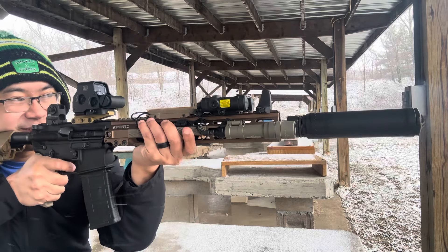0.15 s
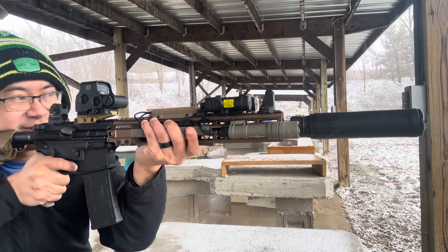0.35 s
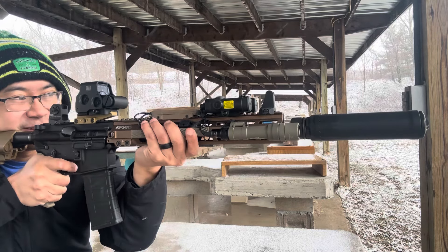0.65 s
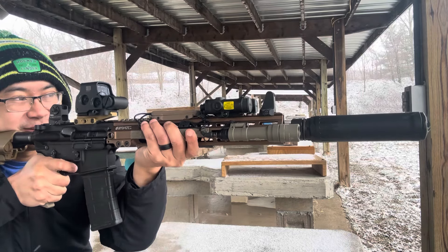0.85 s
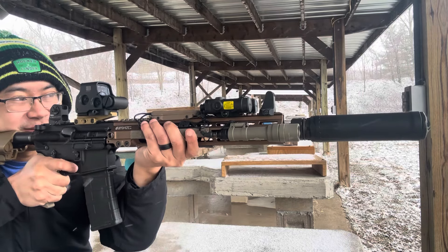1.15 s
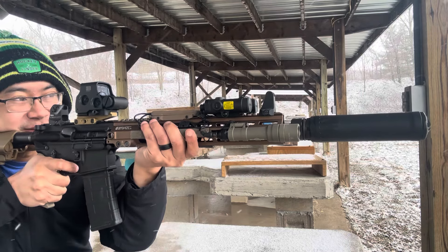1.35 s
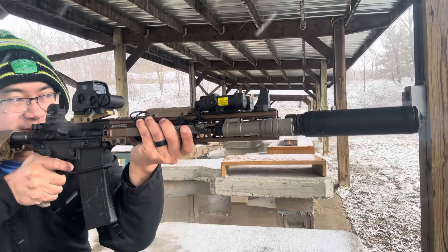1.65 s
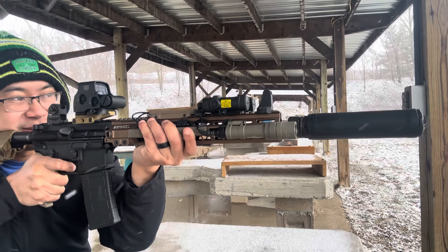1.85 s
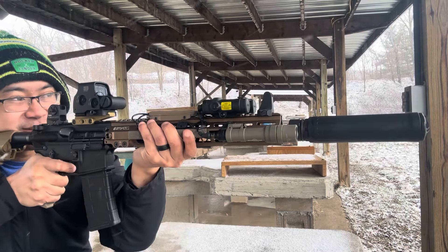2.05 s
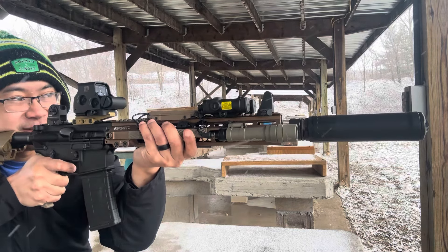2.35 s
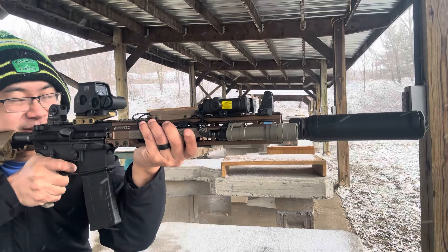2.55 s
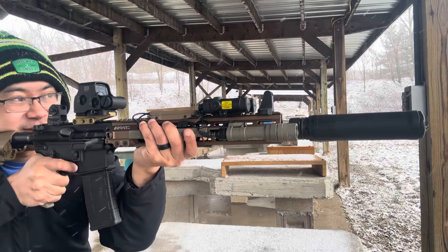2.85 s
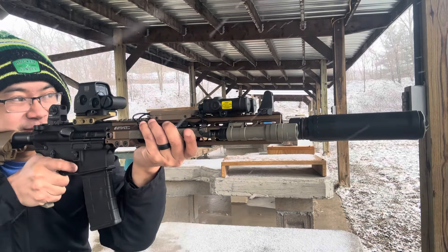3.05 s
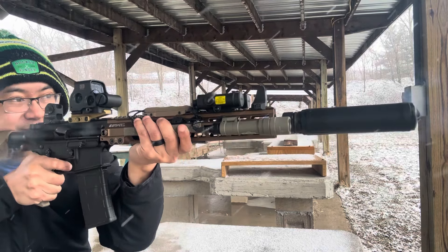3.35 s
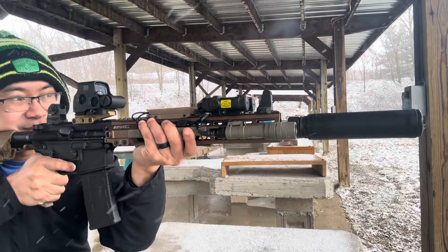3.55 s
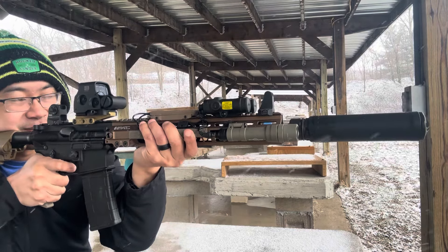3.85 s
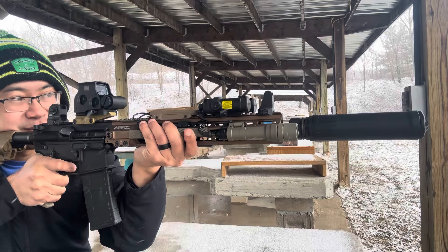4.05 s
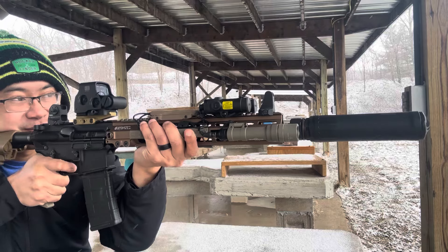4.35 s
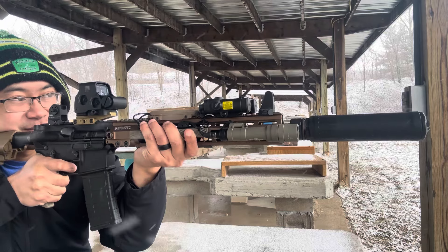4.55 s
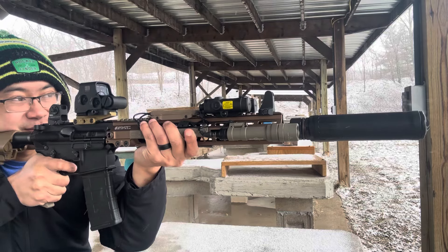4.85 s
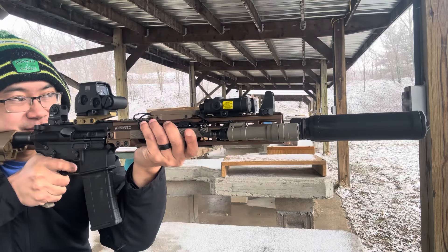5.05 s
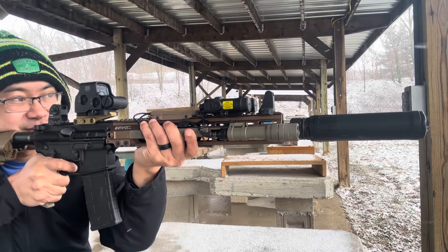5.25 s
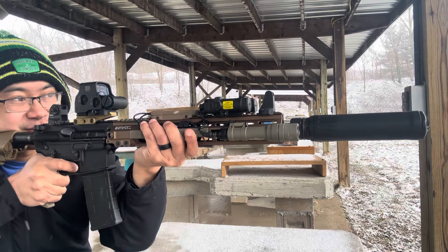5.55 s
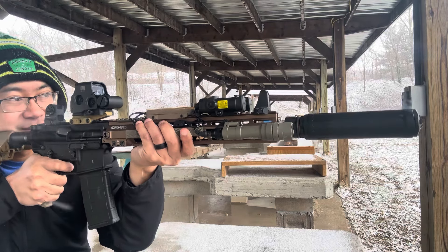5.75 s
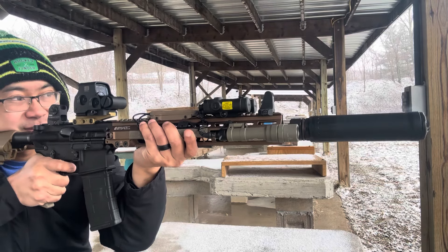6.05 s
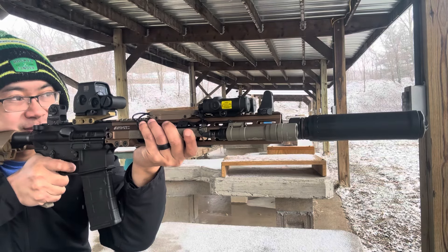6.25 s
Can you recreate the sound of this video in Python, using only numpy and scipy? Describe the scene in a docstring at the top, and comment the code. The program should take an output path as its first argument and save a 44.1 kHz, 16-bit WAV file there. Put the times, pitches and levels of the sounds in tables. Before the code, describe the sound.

Four spaced suppressed rifle shots crack and boom under a tin-roofed winter range, with bolt clacks, woodland echoes, trigger clicks and tinkling brass.

```python
"""Suppressed rifle under a tin roof

Four shots from a semi-automatic rifle on a winter firing line: each is a noise-burst crack, a rush of gas
and the bolt slamming home. Decaying modes make the shelter boom; delayed, dulling noise is the woods' echo.
Between shots brass rings in beating modes, the trigger clicks and shaped noise is wind on the microphone.
"""
import sys
import numpy as np
from scipy import signal
from scipy.io import wavfile

SR = 44100
rng = np.random.default_rng(int(sys.argv[2]) if len(sys.argv) > 2 else 0)


def materialize(psi):
    """Save the field psi as 16-bit PCM at rate SR to the path in sys.argv[1].

    A 1-D psi becomes a single channel; in a 2-D psi each row is a channel.
    """
    bounded = np.clip(np.atleast_2d(psi).T, -1, 1)
    quanta = np.round(bounded * 32767).astype(np.int16)
    wavfile.write(sys.argv[1], SR, quanta)


N = 282681

# standing waves between roof, slab and benches: frequency_hz, relative_level_db, t60_s
SHELTER_MODES = [(132.9, -15, 0.75), (148.5, -26.5, 0.76), (208.8, -25.5, 0.43), (288.2, -28.5, 0.55),
                 (342, -27, 0.45), (419.1, -26, 0.12), (558.8, -19.5, 0.16), (608, -13.5, .2),
                 (755, -20.5, 0.28), (999, -21, 0.17), (1130, -24.5, 0.18), (1284, -28, 0.13),
                 (1404, -28.5, 0.21)]
# spectrum of the dull rush before the crack and of the opening burst: frequency_hz, density_db_per_hz
RUSH_SPECTRUM = [(80, -12.5), (300, 4), (1000, -4.5), (3000, -3), (7000, -7.5), (9000, -38.5),
                 (15000, -53.5)]

BAND_EDGES_HZ = 22 * 2 ** (np.arange(25) * 0.4)
BANDS = [signal.butter(2, edges, "band", fs=SR, output="sos")
         for edges in zip(BAND_EDGES_HZ, BAND_EDGES_HZ[1:])]


def from_db(db):
    """Logarithmic level: 20 dB is a factor of ten in pressure."""
    return 10 ** (np.asarray(db) / 20)


def at_hz(points, hz):
    """Linear interpolation of a table on a logarithmic frequency axis."""
    table_hz, value = np.transpose(points)
    return np.interp(np.log(hz), np.log(table_hz), value)


def seconds(length_s):
    """Sampled time axis, starting at zero."""
    return np.arange(int(length_s * SR)) / SR


def add(out, start_s, sound):
    """Superposition: sound pressures sum, from the start time on."""
    start = max(0, int(start_s * SR))
    part = sound[..., :max(0, N - start)]
    out[:, start:start + part.shape[-1]] += part


def dying(t, t60):
    """Exponential decay, by 60 dB in t60 seconds."""
    return from_db(-60 * t / t60)


def hump(t, peak_s, half_s):
    """Gaussian rise and fall of height 1, down to 1/e at half_s from its peak."""
    return np.exp(-((t - peak_s) / half_s) ** 2)


def waver(t, step_s):
    """Slow random fluctuation: a new normal value every step, joined by straight lines."""
    return np.interp(t / step_s, np.arange(256), rng.standard_normal(size=256))


def delayed(x, left_s, right_s):
    """Travel time: each channel arrives later by its own delay."""
    return np.array([np.pad(side, (int(abs(delay_s) * SR), 0))[:len(side)]
                     for side, delay_s in zip(x, (left_s, right_s))])


def ring(t, hz, db, t60, spread=0.29):
    """Damped oscillation of one mode, reaching the two microphones with different phases."""
    phase = spread * rng.uniform(-1.7, 1, (2, 1))
    return from_db(db) * dying(t, t60) * np.sin(2 * np.pi * hz * t + phase)


def noise(t, spectrum, envelope, grain_db=0, likeness=None):
    """Band-filtered noise of nominal rms 1 times envelope(hz); partial coherence sets the stereo width."""
    # left-right likeness: frequency_hz, correlation (-1 to 1)
    usual_likeness = [(60, 0.3), (140, 1), (300, 0.35), (650, 0.18), (1000, 0.17), (2400, 0.12),
                      (4500, 0.13), (7200, 0.35), (10000, 1), (15000, 0.96)]
    likeness = usual_likeness if likeness is None else likeness
    centres_hz = np.sqrt(BAND_EDGES_HZ[1:] * BAND_EDGES_HZ[:-1])
    gains = from_db(at_hz(spectrum, centres_hz))
    gains = gains / np.sqrt(np.sum(gains ** 2 * np.diff(BAND_EDGES_HZ)) * 2 / SR)
    run_in = 4000  # samples that let the filters settle
    length = len(t) + run_in
    # grain: a random gain for every 20 samples makes the noise crackle
    grains = np.repeat(rng.standard_normal(length), 20)[:length]
    sizes = from_db(grain_db * grains)
    white = rng.standard_normal((2, 2, length)) * sizes / np.sqrt(np.mean(sizes ** 2))
    mid_side = np.zeros((2, len(t)))
    for k, (band, hz) in enumerate(zip(BANDS, centres_hz)):
        alike = np.clip(at_hz(likeness, hz), -1, 1)
        shares = np.sqrt([[(1 + alike) / 2], [(1 - alike) / 2]])
        # neighbouring bands take independent noise
        filtered = signal.sosfilt(band, white[k % 2])[:, run_in:]
        mid_side += filtered * (gains[k] * shares) * envelope(hz)
    mid, side = mid_side
    return np.array([mid + side, mid - side])


def impact(spectrum, t60, roof_db, roof_t60, hold=0.00043):
    """Broadband impulse: a sharp burst and the slower decay of its reflections under the roof."""
    t = seconds(0.5)
    burst = dying(np.maximum(t - hold, 0), t60)
    shape = burst + from_db(roof_db) * dying(t, roof_t60)
    return noise(t, spectrum, lambda hz: shape)


def weather():
    """Low-frequency wind noise: a slackening breeze and gusts on the microphone, over still winter air."""
    # wind on the microphone: frequency_hz, density_db_per_hz
    wind_spectrum = [(20, -9.5), (60, 1), (100, -3), (180, -16), (350, -31), (1000, -58), (15000, -87.5)]
    # still air: frequency_hz, density_db_per_hz
    air_spectrum = [(30, 3.5), (200, -9.5), (600, -5.5), (1500, -10.5), (3000, -21), (6000, -33.5),
                    (15000, -46)]
    # gusts on top of the breeze: peak_s, level_db, half_length_s
    gust_table = [(0.418, -42, 0.099), (0.918, -41.5, 0.027), (1.288, -46.5, 0.089), (2.115, -51, 0.092),
                  (2.782, -56.5, 0.13), (4.075, -66, 0.09), (5.064, -74, 0.057)]
    breeze_db, fall_db_per_s = -56.5, 3
    waver_db, waver_s = 4, 0.058
    t = np.arange(N) / SR
    breeze = from_db(breeze_db - fall_db_per_s * t + waver_db * waver(t, waver_s))
    gusts = sum(from_db(db) * hump(t, peak_s, half_s) for peak_s, db, half_s in gust_table)
    wind = noise(t, wind_spectrum, lambda hz: breeze + gusts)
    return wind + noise(t, air_spectrum, lambda hz: from_db(-79.5))


def downrange():
    """Distant sources: booming returns and a plate as single modes, dull thuds as decaying noise."""
    # the first pop's boom comes back from the near trees: start_s, level_db
    boom_echoes = [(0.263, -23), (0.322, -34.5)]
    # distant thuds: start_s, level_db
    thud_table = [(0.575, -45.5), (4.12, -46)]
    # spectrum of a thud: frequency_hz, density_db_per_hz
    thud_spectrum = [(100, -6), (300, -32), (530, 7), (1000, 2), (3000, -2.5), (9000, -15.5), (15000, -66)]
    # a far steel plate rings: start_s, frequency_hz, level_db, t60_s
    plate = (2.5, 527.5, -70, 4.5)
    out, t = np.zeros((2, N)), seconds(0.76)
    lowest_hz = SHELTER_MODES[0][0]
    for start_s, db in boom_echoes:
        add(out, start_s, ring(t, lowest_hz, db, 0.55, spread=1.0) * (1 - np.exp(-t / 0.013)))
    for start_s, db in thud_table:
        thud = noise(t, thud_spectrum, lambda hz: (1 - np.exp(-t / 0.0061)) * dying(t, 0.24))
        add(out, start_s, from_db(db) * thud)
    add(out, plate[0], ring(seconds(1.6), *plate[1:]))
    return out


def rustle(attack_s=0.014):
    """Friction-like noise while taking aim: it sets in, holds and stops just after the last shot."""
    # the rustle: start_s, length_s, level_db
    timing = (5.43, 0.22, -66)
    start_s, length_s, db = timing
    spectrum = [(100, 2.0), (700, 2), (2000, -2), (5000, -15), (14000, -42.5)]
    out, t = np.zeros((2, N)), seconds(length_s)
    add(out, start_s, from_db(db) * noise(t, spectrum, lambda hz: np.minimum(t / attack_s, 1)))
    return out


def brass():
    """Modal splitting: each case knocks on the slab and rings in two high, beating clusters."""
    # cases landing and bouncing: start_s, knock_db, low_mode_hz, low_mode_db, high_mode_hz,
    # high_mode_db, ring_t60_s
    cases = [(0.733, -40, 10750, -38, 14700, -28, 0.3), (1.3003, -58, 10700, -41.5, 15100, -56, 0.46),
             (1.4935, -61, 10750, -48.5, 14900, -50, .4), (2.263, -49.5, 10750, -57.5, 14800, -47.5, 0.38),
             (2.6197, -64.5, 10750, -60, 15200, -56, 0.6), (3.9914, -53, 10800, -46, 15040, -44, 0.38),
             (4.313, -60.5, 10950, -73, 15040, -65, 1.8), (6.2958, -49, 10600, -56, 14900, -34, 0.3)]
    knock_spectrum = [(2000, -14.5), (7000, -7), (11000, -13.5), (15000, -10)]
    out, t = np.zeros((2, N)), seconds(1)
    for start_s, knock_db, low_hz, low_db, high_hz, high_db, t60 in cases:
        knock = impact(knock_spectrum, t60=0.0022, roof_db=-3.5, roof_t60=0.25)
        add(out, start_s, from_db(knock_db) * knock)
        for hz, db in ((low_hz, low_db), (high_hz, high_db)):
            # a slightly oval, spinning tube splits each mode into a beating cluster
            cluster_hz = hz + rng.normal(0, 65, size=6)
            add(out, start_s, np.mean([ring(t, f, db, t60) for f in cluster_hz], axis=0))
    return out


def action():
    """Impact excitation of modes: the bolt rings the whole action, the trigger its own small parts."""
    # bolt slamming home: start_s, level_db
    bolt = [(0.091, -17.5), (1.637, -14.5), (3.3708, -15), (5.6824, -15)]
    # trigger resets and small clicks of the action: start_s, level_db
    trigger = [(1.168, -74), (1.21, -22), (1.432, -58), (2.816, -32.5), (5.3216, -36)]
    # ringing steel of the action: frequency_hz, relative_level_db, t60_s
    action_modes = [(2645, -14.5, .035), (4390, -12.5, 0.032), (4747, -16, 0.1694), (5000, -3, 0.0063),
                    (5900, 3, 0.016), (7200, -11.5, 0.004), (9100, -8.5, 0.013), (9800, -20.5, 0.09)]
    # small steel parts of the trigger: frequency_hz, relative_level_db, t60_s
    trigger_modes = [(1480, -15.5, 0.062), (5000, 0.5, 0.018), (5600, 2, 0.015), (6560, -4, 0.021),
                     (9700, 2, 0.012), (10000, -9, 0.018)]
    # impact noise of the bolt: frequency_hz, density_db_per_hz
    slam_spectrum = [(300, -12.5), (1000, -4.5), (2200, -10), (4000, 0), (5900, 4), (7300, -8.5),
                     (10000, -0.5), (15000, -25.5)]
    # impact noise of the trigger: frequency_hz, density_db_per_hz
    click_spectrum = [(200, -61), (700, -10), (1700, -4), (3300, -6.5), (5400, 0.5), (7000, -4),
                      (9300, -3.5), (12000, -17), (15500, -19.5)]
    out, t = np.zeros((2, N)), seconds(0.5)
    for start_s, db in bolt:
        steel = sum(ring(t, *mode, spread=2.8) for mode in action_modes)
        slam = impact(slam_spectrum, t60=0.019, roof_db=-22, roof_t60=0.1, hold=0.0024)
        add(out, start_s, from_db(db) * (slam + from_db(1) * steel))
    for start_s, db in trigger:
        steel = sum(ring(t, *mode, spread=1.9) for mode in trigger_modes)
        click = impact(click_spectrum, t60=0.0078, roof_db=-11.5, roof_t60=0.19, hold=0.0011)
        add(out, start_s, from_db(db) * (click + from_db(-0.5) * steel))
    return out


def woods(air_db_per_s_khz=6.0, stretch_s=0.65, stretch_power=0.22, clump_db=1.63, clump_s=0.022,
          lag_s=0.00057):
    """Scattering: trees to the right return the bullet's crack, which stretches and dulls as it travels."""
    # denser stands of trees, the same for every shot: delay_s, level_db, half_length_s
    stand_table = [(0.266, -3, 0.011), (0.335, -11, 0.018), (0.487, -5.5, 0.061), (0.682, -2, 0.048),
                   (0.828, -8, 0.036)]
    # spectrum of the echo: frequency_hz, density_db_per_hz
    echo_spectrum = [(100, -16), (300, -17.5), (700, -7.5), (1200, -4.5), (2000, 0), (2900, 2), (4500, -6),
                     (8000, -7), (13000, -21)]
    # the woods answer once the crack reaches their edge, hold while the bullet flies past, then die away
    edge_s, edge_steepness = 0.28, 6.4
    level_db, hold_s, t60 = -1.52, 0.94, 4.3
    t = seconds(2.6)
    onset = np.minimum(t / edge_s, 1) ** edge_steepness
    scatter = from_db(level_db) * onset * dying(np.maximum(t - hold_s, 0), t60)
    stands = sum(from_db(db) * hump(t, delay_s, half_s) for delay_s, db, half_s in stand_table)
    strength = (scatter + stands) * from_db(clump_db * waver(t, clump_s))
    loss_db_per_hz = -air_db_per_s_khz * t / 1000
    # a longer crack has a lower spectrum, so later echoes sound lower
    stretch = (np.clip(t, edge_s, hold_s) / stretch_s) ** stretch_power

    def envelope(hz):
        """Air absorption and the shift of the spectrum, band by band."""
        shift_db = at_hz(echo_spectrum, hz * stretch) - at_hz(echo_spectrum, hz)
        return strength * from_db(loss_db_per_hz * hz + shift_db)

    echo = noise(t, echo_spectrum, envelope, grain_db=3.0,
                 likeness=[(1000, 0.48), (2400, 0.5), (5000, 0.23)])
    return delayed(echo, lag_s, 0)


def trunks(rise_s=0.00032, t60=0.019):
    """Discrete reflection: each single trunk sends back one short snap."""
    # trunks that answer every shot: delay_s, level_db
    trunk_table = [(0.266, -44.5), (0.332, -37), (0.485, -36.5), (0.507, -43)]
    # spectrum of a snap: frequency_hz, density_db_per_hz
    trunk_spectrum = [(300, 10), (1000, -5), (2600, 26), (4500, -59), (9000, -50)]
    t = seconds(0.87)
    snaps = 0
    for delay_s, db in trunk_table:
        since = np.maximum(t - delay_s, 0)
        snaps = snaps + from_db(db) * np.minimum(since / rise_s, 1) * dying(since, t60)
    return noise(t, trunk_spectrum, lambda hz: snaps, likeness=[(1000, 0.4), (5000, 0.15)])


def boom(build_s=0.0047):
    """Room resonance: standing waves build up over a few round trips, then decay."""
    t = seconds(1.5)
    # long waves reach both microphones nearly alike
    modes = sum(ring(t, hz, db, t60, spread=min(hz / 400, 1.5)) for hz, db, t60 in SHELTER_MODES)
    return modes * (1 - np.exp(-t / build_s))


def flutter(x, trip_s=0.00705, kept=0.21, count=5):
    """Flutter echo: sound bounces back and forth between roof and slab."""
    return sum(np.clip(kept, 0, 0.7) ** k * delayed(x, k * trip_s, k * trip_s) for k in range(count))


def gas(tilt_db, vent_s=0.019, start_db=-0.5, late_db=-23.0, late_t60=0.71):
    """Jet noise: suppressor and port vent for a moment; the shelter holds the rush, then the open range."""
    # spectrum of the rush: frequency_hz, density_db_per_hz
    gas_spectrum = [(25, -10.5), (65, 0), (140, -2), (260, -3), (550, -2.5), (900, -4), (1400, -9),
                    (3300, -12.5), (5500, -12), (7300, -13.5), (9700, -10.5), (13000, -29.5), (15500, -46)]
    # decay under the roof: frequency_hz, t60_s
    roof_decay = [(50, 0.46), (150, 0.35), (400, 0.38), (1200, 0.23), (4000, 0.26), (9000, 0.23),
                  (15000, 0.12)]
    t = seconds(1)
    after = np.maximum(t - vent_s, 0)
    swell = from_db(start_db * np.maximum(1 - t / vent_s, 0))
    late = from_db(late_db) * dying(after, late_t60)
    colour = [(hz, db + tilt_db * np.log2(hz)) for hz, db in gas_spectrum]
    return noise(t, colour, lambda hz: swell * (dying(after, at_hz(roof_decay, hz)) + late), grain_db=-0.5)


def opening_burst(rise_s=0.0036, hold_s=0.015, t60=0.013):
    """A dull burst opens the first round just before its crack, followed by a slow low swing."""
    # pop and shove of air: start_s, pop_db, shove_db
    pop_table = (0.0052, -10.5, -17.5)
    start_s, pop_db, shove_db = pop_table
    out, t = np.zeros((2, N)), seconds(0.72)
    burst = np.minimum(t / rise_s, 1) * dying(np.maximum(t - hold_s, 0), t60)
    add(out, start_s, from_db(pop_db) * noise(t, RUSH_SPECTRUM, lambda hz: burst, grain_db=-1.0))
    add(out, start_s + 0.026, ring(t, 30, shove_db, 0.085, spread=0.1))
    return out


def shots():
    """Impulse and response: a dull rush swells into each crack, then come gas, boom and echo."""
    # shots: start_s, lead_in_db, lead_in_s, crack_db, gas_delay_s, gas_db,
    # gas_brightness_db_per_octave, boom_db, woods_echo_db
    shot_table = [(0.0191, -12, 0.042, -13, 0.017, -20.5, 1.3, -4, -32.5),
                  (1.5630, -19.5, 0.029, -12, 0.0011, -15.5, -0.15, -0.5, -44),
                  (3.2980, -25, 0.016, -9, 0.0011, -15, -0.02, -1, -44),
                  (5.6094, -20, 0.018, -12.5, 0.0025, -16, 0.7, -3, -42)]
    # spectrum of the crack: frequency_hz, density_db_per_hz
    crack_spectrum = [(100, -10.5), (700, 0), (1500, -6.5), (3000, 0), (6000, -12.5), (10000, -9.5),
                      (15000, -16.5)]
    out = opening_burst()
    for start_s, lead_db, lead_s, crack_db, gas_s, gas_db, tilt_db, boom_db, woods_db in shot_table:
        before = seconds(lead_s) - lead_s
        rush = noise(before, RUSH_SPECTRUM, lambda hz: np.abs(1 + before / lead_s) ** 1.5)
        add(out, start_s - lead_s, from_db(lead_db) * rush)
        crack = impact(crack_spectrum, t60=0.0033, roof_db=-25.5, roof_t60=0.24, hold=0.00068)
        add(out, start_s, from_db(crack_db) * flutter(crack))
        add(out, start_s + gas_s, from_db(gas_db) * flutter(gas(tilt_db)))
        add(out, start_s + gas_s, from_db(boom_db) * boom())
        add(out, start_s, from_db(woods_db) * woods())
        add(out, start_s, trunks())
    return out


def scene():
    """Interaural cues: the rifle is a little louder on the right, and sound reaches the right slightly later;
    only the woods' echo, from the right, still arrives later on the left."""
    right_lag_s = 0.0001
    surroundings = weather() + downrange() + rustle() + brass()
    rifle = (action() + shots()) * from_db([[-0.7], [0.6]])
    return delayed(surroundings + rifle, 0, right_lag_s)


def record(dry, top=4.8):
    """Soft saturation rounds the peaks; a zero-phase low-pass cuts the top."""
    cutoff_hz = 16300
    low_pass = signal.butter(16, cutoff_hz, fs=SR, output="sos")
    return signal.sosfiltfilt(low_pass, top * np.tanh(dry / top))


dry = scene()
out = record(dry)
materialize(out)
```